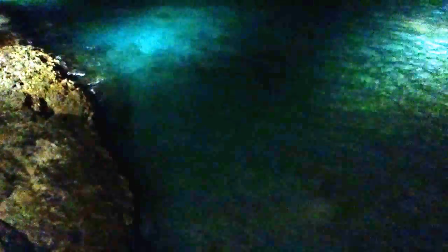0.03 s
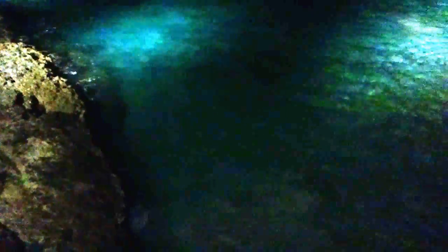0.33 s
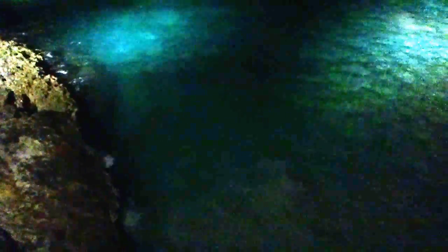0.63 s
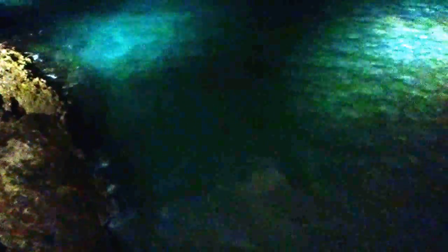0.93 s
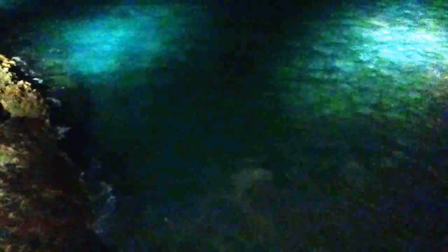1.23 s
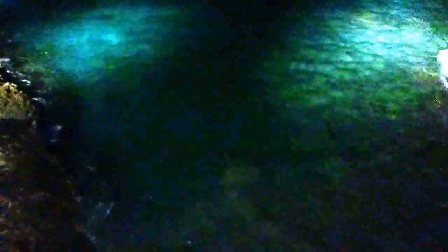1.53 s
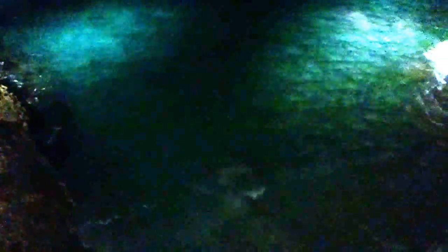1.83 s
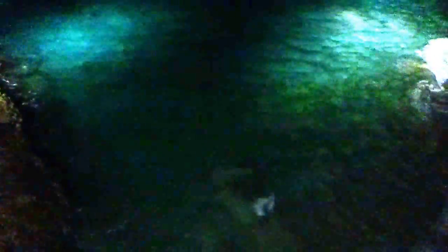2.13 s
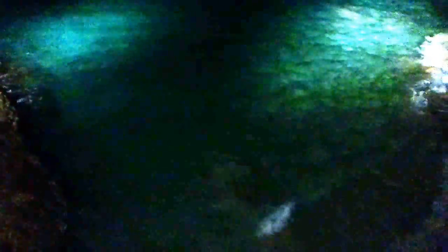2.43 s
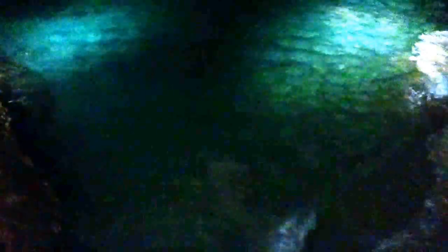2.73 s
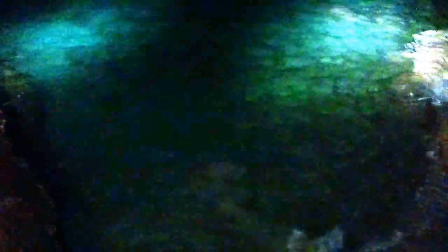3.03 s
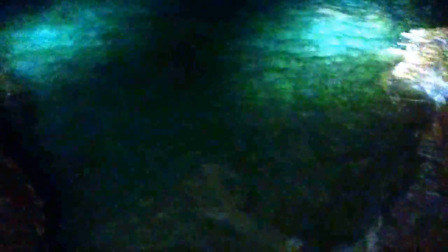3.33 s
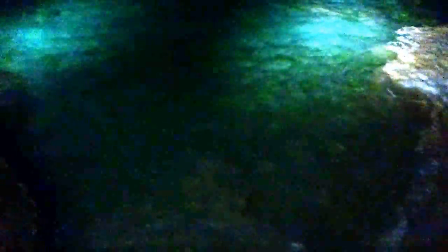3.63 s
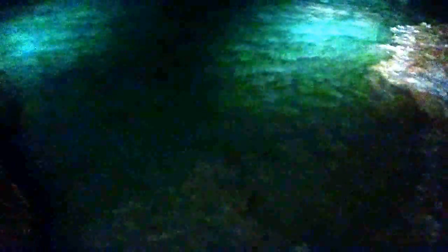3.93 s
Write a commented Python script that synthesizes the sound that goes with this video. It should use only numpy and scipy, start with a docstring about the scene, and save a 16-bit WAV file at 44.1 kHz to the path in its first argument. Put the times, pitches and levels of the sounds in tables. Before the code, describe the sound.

Sea waves wash over rocks, swelling until one breaks with a crash.

```python
"""Night on a rocky shore

A sea wave builds over the steady wash and breaks on the rocks near the end. Rushing water makes
broadband noise: a low roar, a crash and the fizz of foam behind the surge. Trapped air resonates,
high in small bubbles and low in the hollows of the rock, where the water gulps.
Wavelets slap the stone, and a few thrown drops fall back with a plip."""
import sys
import numpy as np
from scipy import signal
from scipy.fft import rfft, irfft
from scipy.io import wavfile
from scipy.ndimage import uniform_filter1d

SR = 44100
rng = np.random.default_rng(int(sys.argv[2]) if len(sys.argv) > 2 else 0)


def persist_wave(psi):
    """Save psi, clipped to +-1, as 16-bit WAV."""
    counts = np.round(np.clip(psi, -1, 1) * 32767).astype(np.int16)
    wavfile.write(sys.argv[1], SR, np.atleast_2d(counts).T)


N = 176400

# Strength of the incoming wave. Each row: time in seconds, relative level in dB.
SURGE_LEVEL = [(0, -29), (.3, -18.5), (.6, -17), (1.0, -15), (1.4, -12), (1.57, -12), (1.75, -9),
               (2.05, -6.5), (2.55, -4.5), (3.1, -3), (3.45, -0.2), (3.62, -1), (3.8, -2.5), (4.0, -4)]


def amp(db):
    """Amplitude grows tenfold for every 20 dB."""
    return 10 ** (np.asarray(db) / 20)


def unit(x):
    """Normalisation to an rms of 1."""
    return x / np.sqrt(np.mean(x ** 2) + 1e-20)


def curve(points):
    """Linear interpolation of a time curve at every sample."""
    return np.interp(np.arange(N) / SR, *np.transpose(points))


def filtered(x, response):
    """Spectral shaping by gains in dB, interpolated over log frequency."""
    hz, db = np.transpose(response)
    gain_db = np.interp(np.log(np.fft.rfftfreq(N, 1 / SR) + 1), np.log(hz + 1), db)
    return irfft(rfft(x) * amp(gain_db), N)


def add(mix, start_s, sound):
    """Superposition of a sound on the mix."""
    part = mix[max(round(start_s * SR), 0):][:len(sound)]
    part += sound[:len(part)]


def burst(t, rise_s, decay_s):
    """Envelope of a damped vibration: soft attack, exponential decay, peak 1."""
    shape = (1 - np.exp(-(t / rise_s) ** 2)) * np.exp(-t / decay_s)
    return shape / shape.max()


def band_noise(n, hz, octaves):
    """Random phases under a Gaussian spectrum give a band of noise."""
    distance = np.log2((np.fft.rfftfreq(n, 1 / SR) + 1) / hz) / octaves
    return unit(irfft(np.exp(-.5 * distance ** 2 + 2j * np.pi * rng.random(len(distance))), n))


def patches(shape, span_s, span_hz, size):
    """Moving averages correlate a random field over time and frequency."""
    frames = max(round(span_s * SR * 4 / size), 1)
    bins = max(round(span_hz * size / SR), 1)
    field = uniform_filter1d(rng.standard_normal(shape), frames, 0)
    return unit(uniform_filter1d(field, bins, 1))


def rushing_water(spectrum, patch_db, patch_s, patch_hz, flicker_db, size=512):
    """Random modulation breaks coloured noise into patches and brief, wide splashes."""
    framing = dict(nperseg=size, noverlap=size * 3 // 4)
    cells = signal.stft(rng.standard_normal(N), **framing)[2].T
    gain_db = patch_db * patches(cells.shape, patch_s, patch_hz, size)
    gain_db += flicker_db * patches(cells.shape, .009, 3000, size)
    noise = signal.istft((cells * amp(gain_db)).T, **framing)[1][:N]
    return unit(filtered(noise, spectrum))


def wash():
    """Countless splashes along the shore sum incoherently to a steady noise."""
    # Each row: frequency in Hz, relative spectral density in dB.
    spectrum = [(20, -15), (80, -10), (150, -6.5), (220, -3.5), (320, -10), (420, -11), (540, -14.5),
                (820, -11.5), (1100, -14.5), (1900, -15.5), (2900, -23), (4500, -23), (5500, -21),
                (8000, -29.5)]
    return amp(-34.5) * rushing_water(spectrum, patch_db=1.5, patch_s=.05, patch_hz=450, flicker_db=.37)


def drops():
    """Each thrown drop falls back with a plip, a heavily damped sinusoid."""
    # Each row: start in seconds, peak level in dB, pitch in Hz.
    impacts = [(.741, -30, 1690), (.764, -34.5, 695), (0.778, -29, 1080), (1.268, -26.5, 770)]
    t = np.arange(SR // 20) / SR
    out = np.zeros(N)
    for start_s, db, hz in impacts:
        add(out, start_s, amp(db) * burst(t, rise_s=1 / hz, decay_s=.0039) * np.sin(2 * np.pi * hz * t))
    return out


def slaps():
    """The impact of a wavelet on stone radiates a short burst of band noise."""
    # Each row: start in seconds, level in dB, centre frequency in Hz.
    wavelets = [(.18, -37.5, 980), (.345, -37, 1700), (.756, -44, 900), (1.114, -38, 600),
                (1.15, -37.5, 1210), (3.34, -32, 2000), (3.435, -33, 720), (3.495, -32, 2100),
                (3.637, -26, 500)]
    t = np.arange(SR // 6) / SR
    envelope = burst(t, rise_s=.0032, decay_s=.03)
    out = np.zeros(N)
    for start_s, db, hz in wavelets:
        add(out, start_s, amp(db) * envelope * band_noise(len(t), hz, octaves=.49))
    return out


def gulps(rise_s=.004, glide_per_s=1.5):
    """Air pockets closing in the rock act as springs and resonate low in the churning water."""
    # Each row: start in seconds, envelope peak in dB, pitch in Hz, decay time in seconds.
    pockets = [(.909, -21.5, 177, 0.009), (1.112, -25.5, 306, 0.013), (1.154, -28, 245, 0.0069),
               (1.6, -26, 205, .008), (1.869, -28.5, 338, .01), (1.932, -21.5, 312, .01),
               (1.947, -26, 208, .013), (2.167, -23, 250, 0.0084), (2.321, -27, 292, 0.0065),
               (2.575, -26.5, 191, .012), (2.769, -21, 278, .004), (3.499, -20, 139, .011),
               (3.56, -23, 200, 0.0058), (3.619, -17, 255, 0.0063), (3.64, -17, 272, 0.0082)]
    t = np.arange(SR // 6) / SR
    out = np.zeros(N)
    for start_s, db, hz, decay_s in pockets:
        cycles = hz * t * (1 + glide_per_s * t / 2)
        ring = np.sin(2 * np.pi * (cycles + rng.random()))
        churn = .27 * band_noise(len(t), hz, octaves=1.0)
        add(out, start_s, amp(db) * burst(t, rise_s, decay_s) * (ring + churn))
    return out


def bubbles(pitches=40, per_s=700, decay_cycles=7.6, spread_db=4, surge_share=.56):
    """Small bubbles ring as damped oscillators, rising in pitch; they grow louder with the surge."""
    out = np.zeros(N)
    for hz in np.geomspace(550, 6500, pitches):
        decay_s = decay_cycles / hz
        t = np.arange(0, 5 * decay_s, 1 / SR)
        cycles = hz * t * (1 + .015 * t / decay_s)
        ring = burst(t, .5 / hz, decay_s) * np.sin(2 * np.pi * cycles)
        strengths = amp(spread_db * np.minimum(rng.exponential(1, N), 4))
        births = rng.random(N) < per_s / pitches / SR
        out += signal.oaconvolve(strengths * births, ring)[:N]
    return amp(-39.5 + surge_share * curve(SURGE_LEVEL)) * unit(out)


def foam():
    """The tiny bubbles of the foam merge into high-frequency noise."""
    # Amount of foam. Each row: time in seconds, relative level in dB.
    amount = [(0, -23), (.4, -11.5), (.85, -6.5), (1.6, -7), (2.1, -6.5), (2.6, -2.5), (3.3, -3),
              (3.7, -0.5), (4.0, 2)]
    # Each row: frequency in Hz, relative spectral density in dB.
    spectrum = [(300, -10.5), (1500, -5), (3100, -16), (4000, -5), (4700, -1), (5450, 0), (6200, -2.5),
                (8000, -10.5)]
    fizz = rushing_water(spectrum, patch_db=1.2, patch_s=.063, patch_hz=400, flicker_db=.5)
    return amp(-34.5 + curve(amount)) * fizz


def wave_roar():
    """Turbulent water in the incoming wave makes a low noise that swells with the surge."""
    # Each row: frequency in Hz, relative spectral density in dB.
    spectrum = [(20, -15.5), (55, -4), (150, 0.5), (230, -0.4), (350, 1), (560, -7), (850, -6.5),
                (1100, -8), (1500, -6.5), (2150, -8.5), (2650, -11.5), (3400, -12), (4500, -17),
                (6000, -18.5), (8000, -29.5)]
    roar = rushing_water(spectrum, patch_db=.06, patch_s=.06, patch_hz=500, flicker_db=.06)
    return amp(-23 + curve(SURGE_LEVEL)) * roar


def wave_crash():
    """Impact on the rocks radiates uneven broadband noise: a small wave first, then the big one."""
    # Strength of the breaking. Each row: time in seconds, relative level in dB.
    breaking = [(0, -15.5), (.38, -11), (.75, -27.5), (2.9, -19.5), (3.15, -3.5), (3.38, -4), (3.68, 0.5),
                (4.0, -3.5)]
    # Each row: frequency in Hz, relative spectral density in dB.
    spectrum = [(25, 3.5), (70, 7), (150, 7.5), (300, -10), (600, -2.5), (1100, -8), (1500, -3.5),
                (1850, 0.5), (2170, 4), (2500, -4), (3600, -0.5), (4700, -8), (5600, -10), (6700, -7.5),
                (8000, -8)]
    crash = rushing_water(spectrum, patch_db=1.5, patch_s=.1, patch_hz=297, flicker_db=1.7)
    return amp(-26.5 + curve(breaking)) * crash


def scene():
    """The pressures of all sources add in one channel, heard from the rocks above."""
    mix = wash() + drops() + slaps() + gulps() + bubbles() + foam() + wave_roar() + wave_crash()
    return mix[None]


def record(dry, cutoff_hz=8000, offset=-.088):
    """A dull microphone acts as a low-pass filter with a steep edge and adds a constant offset."""
    # Each row: frequency in Hz, gain in dB.
    response = [(20, -5), (5500, -0.5), (6500, -3.5), (7200, -6.5), (7900, -15.5)]
    low_pass = signal.firwin(611, cutoff_hz, window=("kaiser", 9), fs=SR)
    return offset + signal.oaconvolve(filtered(dry, response), low_pass[None], "same")


dry = scene()
out = record(dry)
persist_wave(out)
```